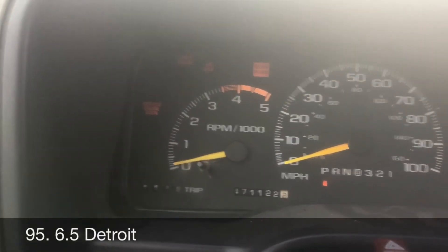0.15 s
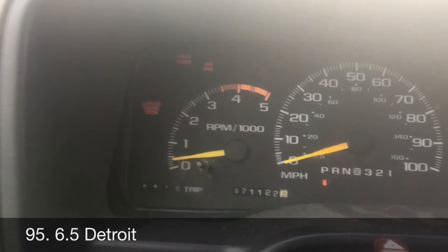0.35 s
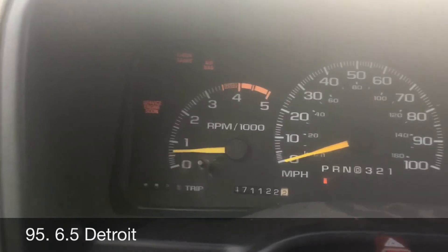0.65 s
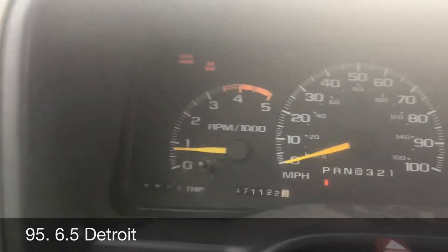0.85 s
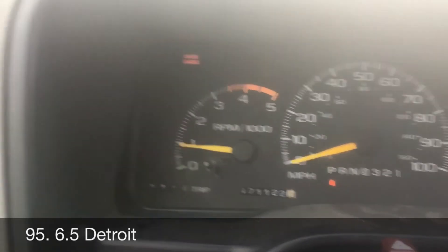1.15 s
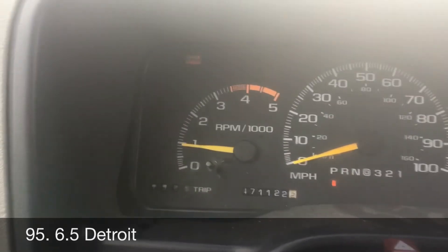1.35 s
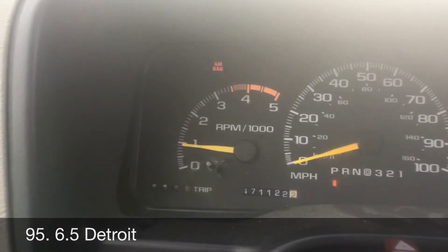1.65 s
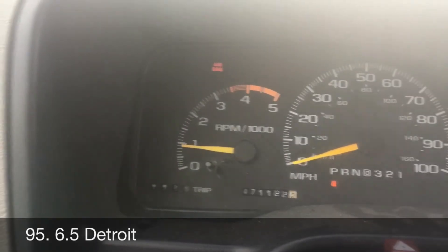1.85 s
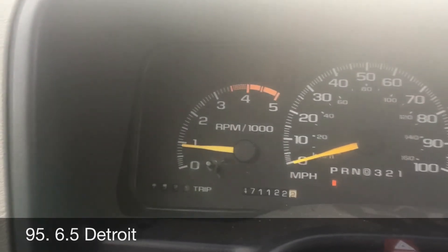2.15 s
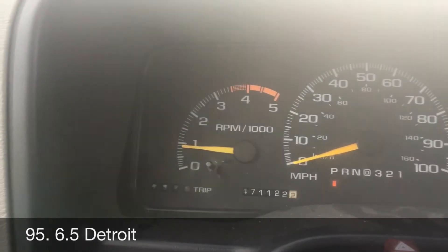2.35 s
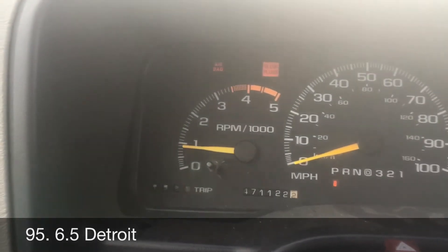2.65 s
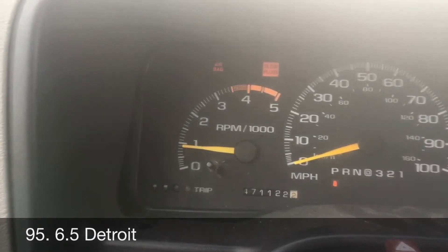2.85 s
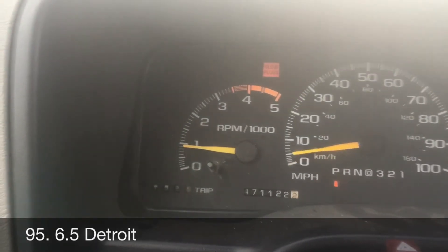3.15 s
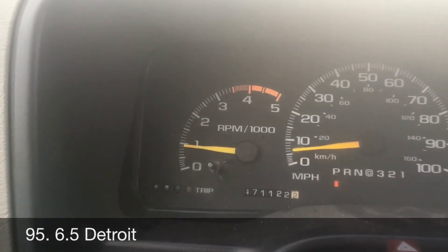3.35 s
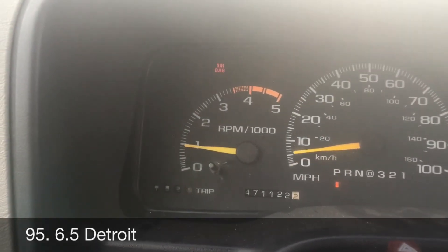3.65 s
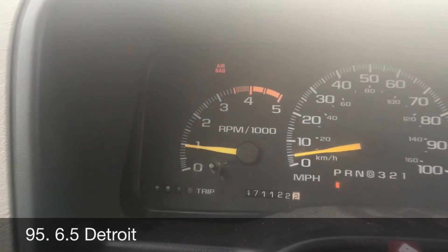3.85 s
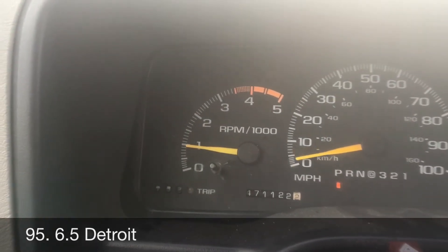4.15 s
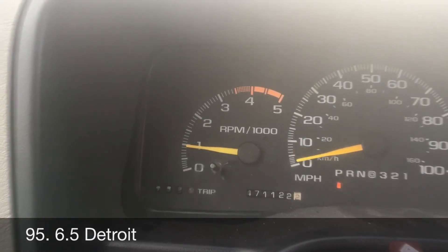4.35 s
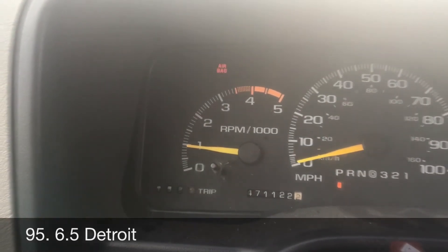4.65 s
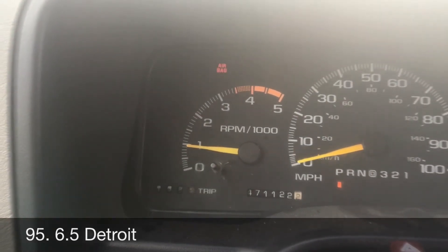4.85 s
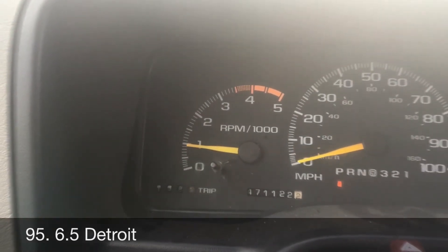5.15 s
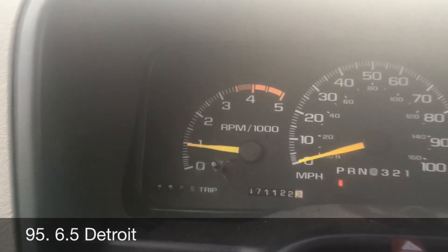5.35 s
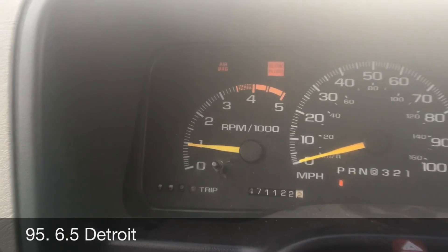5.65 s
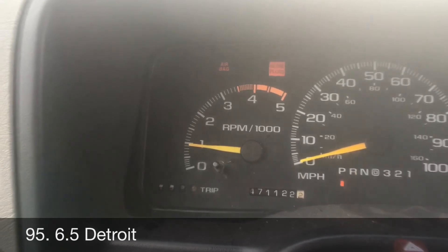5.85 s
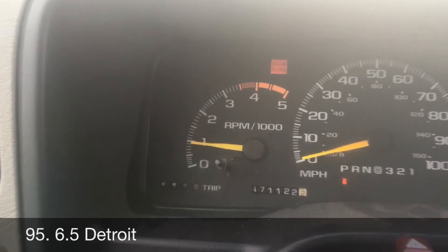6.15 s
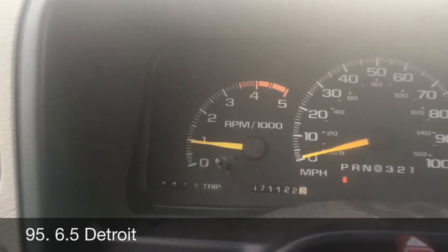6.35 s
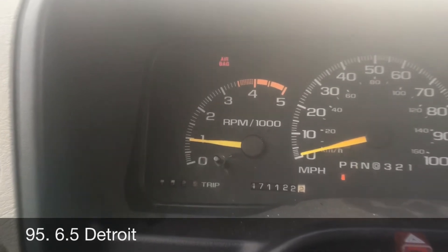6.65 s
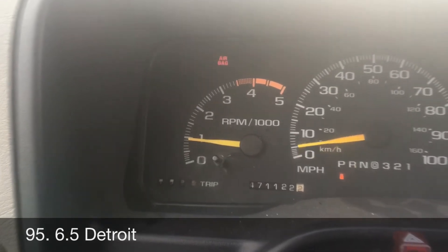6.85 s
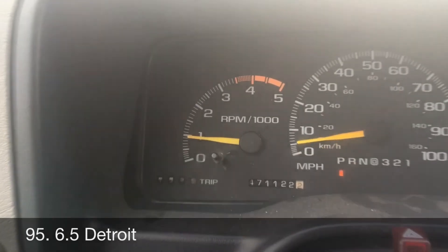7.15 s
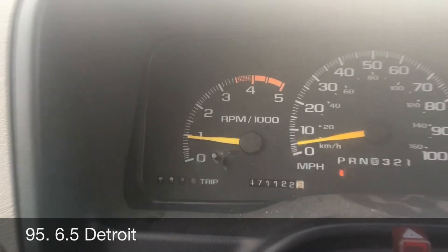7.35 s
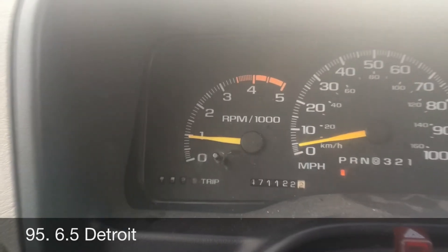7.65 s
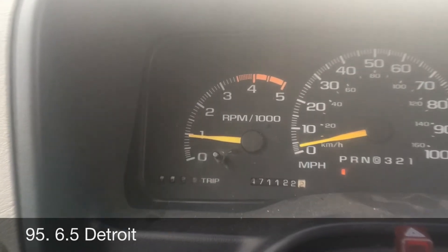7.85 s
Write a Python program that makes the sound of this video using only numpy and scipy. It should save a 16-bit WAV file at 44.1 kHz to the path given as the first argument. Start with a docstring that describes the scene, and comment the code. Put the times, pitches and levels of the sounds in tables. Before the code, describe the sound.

From the driver's seat of a shut diesel pickup, the tail of a starter growls, clunks and whirrs for under a second. The engine catches and flares with a deep boom, small clicks and squeaky belt chirps. It stumbles unevenly for a couple of seconds, revs up slightly, then holds a fast idle of low throbbing exhaust, muffled combustion knock and rapid injector ticking. The microphone is close inside the boomy cab, with little deep bass and faint hiss.

```python
"""A starter whirrs, clunks and growls, heard from the driver's seat of a cold V8 diesel pickup, doors shut.
The engine catches, flares with a few belt chirps, hunts and settles to a fast idle.
Exhaust orders swell in the booming cab; each firing also sets off noise bursts for the combustion knock,
its ring in the block and the injector ticking, through the bulkhead. Belt tones and a faint hiss lie on top."""
import sys
import numpy as np
from scipy import signal
from scipy.fft import rfft, irfft
from scipy.io import wavfile
from scipy.ndimage import uniform_filter1d

SR = 44100
rng = np.random.default_rng(int(sys.argv[2]) if len(sys.argv) > 2 else 0)


def to_wav(sig):
    """Store sig (one row per channel, or 1-D mono) as 16-bit WAV at the path in sys.argv[1].

    Samples outside -1..1 are clipped; the rate is SR.
    """
    pcm = np.clip(np.atleast_2d(sig), -1, 1) * 32767
    pcm = np.round(pcm).astype(np.int16)
    wavfile.write(sys.argv[1], SR, pcm.T)  # frames by channels


N = 353682
TIME = np.arange(N) / SR  # s

# The crankshaft catches, flares, sags and is twice nudged up by the governor.
# Each row: time in seconds, engine speed in rpm.
SPEED_CURVE = [(0.0, 513.1), (0.33, 555.5), (0.9, 955.4), (1.19, 992.0), (1.53, 849.4), (2.57, 820.0),
               (3.29, 904.7), (3.56, 993.8), (3.79, 958.3), (4.83, 866.6), (5.0, 922.6), (5.4, 863.1),
               (7.21, 880.7), (8.02, 863.8)]
IDLE_RPM = 870

# The eight cylinders in firing order, before their differences are scaled over time.
# Each row: knock in dB, injector tick in dB, hard ringing knock in dB.
CYLINDER_PATTERN = [(-2.5, 0.5, -2.5), (-1.5, -4.5, -10), (-4.5, -3, -13), (0.5, 2.5, -9.5), (-1, 4, 1.5),
                    (0.5, 4, 0.5), (1.5, -1, 3.5), (-1, 1, 0)]

# Bright colour of the injectors, and of the starter's rasp. Each row: frequency in Hz, relative level in dB.
TICK_SPECTRUM = [(900, -30.5), (1500, -2.5), (2100, 1), (2700, -5), (3300, -13.5), (4000, -23.5),
                 (5000, -24), (7000, -28.5), (10000, -35), (15000, -47)]


def from_db(db):
    """Decibels to amplitude gain."""
    return 10 ** (np.asarray(db) / 20)


def rms_one(x):
    """Scale to an rms of one."""
    return x / np.sqrt(np.mean(x ** 2) + 1e-20)


def in_time(rows):
    """Each column of a curve, interpolated at every sample."""
    seconds, *columns = np.transpose(rows)
    return [np.interp(TIME, seconds, column) for column in columns]


def evened(x, seconds):
    """Hold the running rms at one, keeping all that is faster."""
    size = int(seconds * SR / 2)
    power = np.abs(uniform_filter1d(uniform_filter1d(x ** 2, size), size))
    return x / np.sqrt(power + 1e-4 * np.mean(x ** 2))


def butter(x, hz, kind, order=2):
    """Butterworth filter."""
    sections = signal.butter(order, hz, kind, fs=SR, output="sos")
    return signal.sosfilt(sections, x + 1e-18)


def resonate(x, hz, width_hz):
    """One two-pole resonance with a gain of one on its top."""
    r = np.exp(-np.pi * width_hz / SR)
    zeros = np.array([1, 0, -1]) * (1 - r * r) / 2
    poles = [1, -2 * r * np.cos(2 * np.pi * hz / SR), r * r]
    return signal.lfilter(zeros, poles, x + 1e-18)


def coloured(x, spectrum, size=8192):
    """Causal (minimum-phase) filter that follows a spectrum."""
    hz, db = np.transpose(spectrum)
    grid = np.maximum(np.arange(size // 2 + 1) * SR / size, 1)
    below = np.minimum(grid / hz[0], 1) ** 2  # fall away under the lowest point
    gain = below * from_db(np.interp(np.log(grid), np.log(hz), db))
    cepstrum = irfft(np.log(gain + 1e-5))
    # folding the cepstrum onto positive time gives minimum phase
    response = irfft(np.exp(rfft(2 * cepstrum[:size // 2], size) - cepstrum[0]))
    return signal.fftconvolve(x, response)[:N]


def impulses(times, gains):
    """A click of the given height at each time."""
    out = np.zeros(N)
    at = np.round(times * SR).astype(int)
    inside = (at >= 0) & (at < N)
    np.add.at(out, at[inside], gains[inside])
    return out


def dying(x, t60):
    """Each click becomes an exponential decay that falls 60 dB in t60 seconds."""
    return signal.lfilter([1], [1, -from_db(-60 / (t60 * SR))], x + 1e-18)


def hits(table, spectrum, t60):
    """Short bursts of coloured noise, each struck at once and dying away."""
    times, db = np.transpose(table)
    noise = rms_one(coloured(rng.standard_normal(N), spectrum))
    return dying(impulses(times, from_db(db)), t60) * noise


def swell(full_s, until_s, db, rise_db_per_s, fall_db_per_s):
    """Gain that rises, holds and dies away."""
    before = np.maximum(full_s - TIME, 0)
    after = np.maximum(TIME - until_s, 0)
    return from_db(db - rise_db_per_s * before - fall_db_per_s * after)


def ramp(start_s, length_s):
    """Go from zero to one."""
    return np.clip((TIME - start_s) / length_s, 0, 1)


def bump(at_s, half_s):
    """A smooth Gaussian hump of height one."""
    return np.exp(-((TIME - at_s) / half_s) ** 2 / 2)


def wavering(hz, width_hz):
    """Noise twice through a resonance: an unsteady tone of rms one."""
    once = resonate(rng.standard_normal(N), hz, width_hz)
    return rms_one(resonate(once, hz, width_hz))


def cycles():
    """Four-stroke cycles completed: two turns of the crank each."""
    rpm = in_time(SPEED_CURVE)[0]
    return np.cumsum(rpm) / 120 / SR


def firings(delay):
    """Times and cylinder numbers of the firings; delay in firing intervals."""
    fired = cycles() * len(CYLINDER_PATTERN)
    number = np.arange(int(fired[-1]))
    return np.interp(number + delay, fired, TIME), number % len(CYLINDER_PATTERN)


def starter():
    """The starter whirrs and runs down, its gear clunks against the ring, and the pinion rasps out of mesh."""
    # Colour of the whirr. Each row: frequency in Hz, relative level in dB.
    whirr_spectrum = [(300, 11.5), (500, 4), (660, 10.5), (850, -2.5), (1150, 5), (1700, -19.5),
                      (2400, 1.5), (3000, -5.5), (3700, -7.5), (4200, -24.5), (5000, -19), (5600, -21),
                      (8000, -35.5)]
    # Pinion grinding out of mesh.
    # Each row: full at seconds, held until seconds, level in dB, rise in dB per s, fall in dB per s.
    rasp_swells = [(0.761, 0.783, -39.5, 450, 330), (0.93, .95, -43.5, 250, 120)]
    # Gear clunks. Each row: time in seconds, level in dB.
    clunk_hits = [(.071, -29.5), (.108, -37), (.137, -34), (.178, -37), (.206, -40)]
    # Colour of the clunks. Each row: frequency in Hz, relative level in dB.
    clunk_spectrum = [(150, -6), (400, 0), (680, 11), (1000, -3), (1600, -6), (3000, -14.5), (4500, -29),
                      (10000, -42)]

    spin = swell(full_s=0, until_s=.9, db=-46, rise_db_per_s=0, fall_db_per_s=100)
    whirr = spin * rms_one(coloured(rng.standard_normal(N), whirr_spectrum))
    grinding = sum(swell(*row) for row in rasp_swells)
    rasp = grinding * rms_one(coloured(rng.standard_normal(N), TICK_SPECTRUM))
    return whirr + rasp + hits(clunk_hits, clunk_spectrum, t60=0.1)


def boom_db():
    """Level of the exhaust: it lopes once a cycle while cold, surges on hard burns and drops out at misfires."""
    # Exhaust boom before lope, surges and misfires. Each row: time in seconds, level in dB.
    boom_level = [(0, -28.5), (.09, -19), (.75, -15.5), (1.05, -12), (1.5, -15.5), (2.7, -13.5),
                  (4.6, -15.5), (6.6, -14.5), (7.4, -16.5), (8, -15.5)]
    # A hard burn makes the boom surge. Each row: time in seconds, lift in dB.
    surge_lifts = [(.91, 3.5), (1.125, 5.5), (1.275, 5)]
    # A cylinder misfires and the boom drops out. Each row: time in seconds, dip in dB.
    misfire_dips = [(.785, 7), (1.179, 4), (1.375, 10), (1.52, 9), (1.925, 7.5), (2.301, 11.5),
                    (2.595, 10.5), (2.95, 8)]

    peak_place = 0.47  # where in the cycle the lope peaks, 0-1
    lope_swing_db = 1.5 * bump(at_s=1.9, half_s=1.0)
    lope = lope_swing_db * np.cos(2 * np.pi * (cycles() - peak_place))
    surges = sum(lift * bump(s, half_s=0.015) for s, lift in surge_lifts)
    misfires = sum(dip * bump(s, half_s=.018) for s, dip in misfire_dips)
    return in_time(boom_level)[0] + lope + surges - misfires


def exhaust(pipe_delay, dispersion):
    """Engine orders slide through the cab's boom and beat three times a cycle; uneven burns add rumble."""
    # The boom of the closed cab. Each row: frequency in Hz, relative level in dB.
    cab_spectrum = [(25, -42.5), (36, -4), (48, -6), (60, 2), (80, 0.5), (96, -9), (120, -15.5), (145, -12),
                    (175, -19.5), (205, -23), (300, -28.5), (500, -74.5)]
    # Exhaust tones; 8 is the firing rate, 11 and 13 come from the uneven beat of each bank.
    # Each row: multiple of the cycle rate, level in dB before the cab.
    exhaust_orders = [(6, -16.5), (7, -12), (8, 2.5), (9, -7.5), (10, -17), (11, 3.5), (13, -7.5),
                      (14, -3.5), (15, -2.5), (16, 1), (17, -9.5), (19, 2), (20, -12), (23, 0.5), (24, -6)]

    turned = cycles()
    cycle_hz = np.gradient(turned) * SR
    cab_hz, cab_db = np.transpose(cab_spectrum)
    steady = np.zeros(N)
    for order, db in exhaust_orders:
        order = round(order)
        gain = from_db(db + np.interp(np.log(order * cycle_hz), np.log(cab_hz), cab_db))
        # the silencer delays each order differently, which smears the pulses
        lag = order * pipe_delay + dispersion * (order - len(CYLINDER_PATTERN)) ** 2
        steady += gain * np.cos(2 * np.pi * (order * turned - lag))

    times, _ = firings(delay=0.525)
    burns = coloured(impulses(times, rng.standard_normal(len(times))), cab_spectrum)
    rush = 0.018 * coloured(rng.standard_normal(N), cab_spectrum)
    uneven = butter(burns + rush, 423, "low", order=3)
    # the irregular part fades by 1 dB per s as the cylinders warm
    irregular = from_db(-2 - 1 * TIME) * evened(uneven, seconds=0.12)
    boom = evened(steady, seconds=0.11) + irregular
    return from_db(boom_db()) * evened(boom, seconds=0.15)


def blows(pattern_db, delay, rise_s, t60, repeat_share, rough_db):
    """Each firing sets off a dense ring building up through the bulkhead, part alike each time, part random."""
    # How strongly the cylinders differ. Each row: time in seconds, factor on their pattern.
    unevenness = [(.9, .2), (1.35, 1.5), (3.5, 1.93), (4.6, 1.13), (8, 0.99)]

    times, cylinder = firings(delay)
    depth = np.interp(times, *np.transpose(unevenness))
    strength, late = rng.standard_normal((len(times), 2)).T
    gains = from_db(depth * pattern_db[cylinder] + rough_db * strength)

    age = TIME[:SR // 6]
    fade = (1 - np.exp(-age / rise_s)) * from_db(-60 * age / t60)
    rings = rng.standard_normal((len(CYLINDER_PATTERN), len(fade))) * fade
    alike = np.zeros(N)
    for number, ring in enumerate(rings):
        own_blows = impulses(times, gains * (cylinder == number))
        alike += signal.oaconvolve(own_blows, ring)[:N]

    # valves and loose parts rattle a little early or late, in small clumps
    scattered = impulses(times + late * 0.0041, gains ** 2)
    power = np.abs(signal.oaconvolve(scattered, fade ** 2)[:N])
    clump_db = 1.0 * rms_one(butter(rng.standard_normal(N), 100, "low"))
    clumps = rms_one(from_db(clump_db))
    share = np.clip(repeat_share, 0, 1)
    rattle = np.sqrt((1 - share) * power) * clumps * rng.standard_normal(N)
    return np.sqrt(share) * alike + rattle


def block(x):
    """The iron block and the bulkhead lift their own resonances."""
    # Each row: resonance in Hz, width in Hz, lift in dB.
    resonances = [(336, 8.3, 6), (477, 6, 6), (531.5, 30, 5), (935, 33, 4.5), (1108, 19, 5),
                  (1162, 16, 9.5), (1522, 4.3, 6.5), (1772, 14, 10), (1970, 54, 6), (2275, 13, 8),
                  (2525, 86, 2.5), (4490, 93, 6)]
    return x + sum((from_db(db) - 1) * resonate(x, hz, width) for hz, width, db in resonances)


def injector_db():
    """Level of the ticking, from engine speed, warmth and the governor's extra fuel."""
    revs = 0.02 * (in_time(SPEED_CURVE)[0] - IDLE_RPM)  # dB, at 0.02 dB per rpm
    cold = -7.5 * np.exp(-TIME / 2.97)  # dB, quieter until the engine warms
    # extra fuel lifts the idle, and the ticking turns to clacking
    clack = 3.5 * bump(at_s=3.3, half_s=0.43)
    return -45 + revs + cold + clack


def clatter():
    """Combustion knock, its hard ring in the block, and the brighter ticking of injectors and valves."""
    # Combustion knock, hardest under the load of the flare, before the late hardening.
    # Each row: time in seconds, level in dB.
    knock_level = [(0, -38), (.27, -51.5), (.5, -37.5), (.85, -36.5), (1.0, -31.5), (1.6, -34), (2.05, -35),
                   (2.25, -39.5), (3.3, -35.5), (4.7, -36.5), (8, -35.5)]
    # Colour of the knock ahead of the block. Each row: frequency in Hz, relative level in dB.
    knock_spectrum = [(130, -11.5), (220, 6.5), (400, 0.5), (700, 2), (1000, -3.5), (1400, -2.5),
                      (1900, -12.5), (2500, -18.5), (3500, -44), (5000, -68.5)]
    # Colour of the hard ring ahead of the block. Each row: frequency in Hz, relative level in dB.
    ring_spectrum = [(500, -22.5), (750, -12.5), (920, 1.5), (1180, -2.5), (1350, -10), (1700, -14),
                     (2300, -21), (4000, -58)]

    # late on the knock hardens all at once
    knock_db = in_time(knock_level)[0] + 3.5 * ramp(start_s=7.42, length_s=0.084)
    # the ring follows the knock, grows as the engine warms and is harder as the flare dies back
    ring_growth_db = 0.99 * TIME
    ring_db = knock_db - 12 + ring_growth_db + 3 * bump(at_s=1.45, half_s=.3)

    knock_pattern, tick_pattern, ring_pattern = np.transpose(CYLINDER_PATTERN)
    knock = blows(knock_pattern, delay=-0.0988, rise_s=0.003, t60=0.14, repeat_share=0.37, rough_db=1.34)
    ring = blows(ring_pattern, delay=-0.1012, rise_s=0.0027, t60=0.09, repeat_share=0.1, rough_db=2.2)
    tick = blows(tick_pattern, delay=-.2, rise_s=0.0055, t60=0.15, repeat_share=0.29, rough_db=1.94)
    knock = from_db(knock_db) * evened(block(coloured(knock, knock_spectrum)), seconds=0.4)
    ring = from_db(ring_db) * evened(block(coloured(ring, ring_spectrum)), seconds=1.0)
    tick = from_db(injector_db()) * evened(block(coloured(tick, TICK_SPECTRUM)), seconds=0.93)
    return knock + ring + tick


def hiss():
    """Faint high noise that follows the revs and slowly fades, with three swells topped by a thin whistle."""
    # Colour of the hiss. Each row: frequency in Hz, relative level in dB.
    hiss_spectrum = [(3500, 0.5), (4900, -18), (5400, -4.5), (6500, 1), (7100, -4), (7600, -7.5),
                     (8800, -1), (10300, -12.5), (11100, -9.5), (11650, -5.5), (12200, -10.5),
                     (15500, -9.5)]
    # When it swells. Each row: full at seconds, held until seconds.
    hiss_swells = [(1.6, 2.72), (3.9, 5.8), (6.88, 6.9)]

    revs_db = 0.0124 * (in_time(SPEED_CURVE)[0] - IDLE_RPM)
    fade_db = 0.45 * TIME
    steady_db = -62.0 + revs_db - fade_db
    swells = sum(swell(full, until, db=-64, rise_db_per_s=88, fall_db_per_s=88) for full, until in hiss_swells)
    steady = rms_one(coloured(rng.standard_normal(N), hiss_spectrum))
    swelling = rms_one(coloured(rng.standard_normal(N), hiss_spectrum))
    whistle = from_db(-16) * wavering(11640, width_hz=600)
    return from_db(steady_db) * steady + swells * (swelling + whistle)


def shudder():
    """The starter and the rocking engine shake the cab; one dash panel drones and the intake honks."""
    # Dash panel: a burst, then a lingering drone.
    # Each row: full at seconds, held until seconds, level in dB, rise in dB per s, fall in dB per s.
    drone_swells = [(0.672, 0.725, -29, 86, 175), (1.0, 1.1, -41.5, 25, 2.07)]

    growl = swell(full_s=.08, until_s=.22, db=-21, rise_db_per_s=25, fall_db_per_s=95)
    # the engine rocks on its mounts during the flare
    rocking = swell(full_s=1.05, until_s=1.1, db=-29.5, rise_db_per_s=28, fall_db_per_s=20)
    rumble = evened(butter(rng.standard_normal(N), [115, 175], "band", order=3), seconds=0.056)
    panel = evened(wavering(272, width_hz=9), seconds=0.022)
    drone = sum(swell(*row) for row in drone_swells) * panel
    # intake under load; its rise and fall cross before either is complete
    load = swell(full_s=1.37, until_s=1.33, db=-38.5, rise_db_per_s=17, fall_db_per_s=22.5)
    honk = load * wavering(652, width_hz=140)
    return (growl + rocking) * rumble + drone + honk


def key_clicks():
    """Key switch and trim click close by: short bright noise bursts."""
    # Each row: time in seconds, level in dB.
    click_hits = [(.538, -57), (.638, -36), (.748, -42.5), (1.257, -47)]
    # Colour of the clicks. Each row: frequency in Hz, relative level in dB.
    click_spectrum = [(1000, -11), (4000, -13), (5500, -7.5), (6900, -2), (7800, -10.5), (9500, -13),
                      (13000, -19), (16000, -7)]
    return hits(click_hits, click_spectrum, t60=0.057)


def belt_chirps(fall_per_s, rasp):
    """The cold belt slips: short rough chirps that sag in pitch."""
    # Each row: time in seconds, pitch in Hz, level in dB, half length in seconds.
    chirps = [(0.788, 1870, -31, 0.019), (0.871, 1540, -35, 0.0071), (0.931, 1470, -27.5, 0.0061),
              (1.028, 1410, -33, 0.0076), (1.103, 1524, -29, .008), (1.182, 1520, -24.5, 0.0028),
              (1.241, 1140, -26.5, 0.0048), (1.376, 1174, -32, 0.02), (2.001, 1480, -28.5, 0.008)]

    out = np.zeros(N)
    waver = rasp * rms_one(butter(rng.standard_normal(N), 204, "low"))
    for s, hz, db, half in chirps:
        pitch = hz * (1 - fall_per_s * (TIME - s) + waver)
        out += from_db(db) * bump(s, half) * np.sin(2 * np.pi * np.cumsum(pitch) / SR)
    return out


def belt_song():
    """Light, steady slip keeps the belt singing in two wavering tones."""
    # Each row: tone in Hz, width in Hz, relative level in dB.
    belt_tones = [(1537, 130, 0.5), (1730, 70, -2.5)]
    # Loud at first, then lingering.
    # Each row: full at seconds, held until seconds, level in dB, rise in dB per s, fall in dB per s.
    song_swells = [(1.497, 2.0, -47.5, 45, 59), (1.6, 1.697, -50, 40, 1.6)]

    tones = sum(from_db(db) * wavering(hz, width) for hz, width, db in belt_tones)
    return sum(swell(*row) for row in song_swells) * rms_one(tones)


def scene():
    """Everything at the driver's seat, in one channel."""
    # pipe delay in cycles of each order's own tone, per order
    engine = exhaust(pipe_delay=.436, dispersion=0.02507) + clatter() + shudder()
    # pitch falls by 1.2 of itself per second; rasp is the rms share of the pitch
    belt = belt_chirps(fall_per_s=1.2, rasp=0.0356) + belt_song()
    return (starter() + engine + hiss() + key_clicks() + belt)[None]


def record(dry):
    """The microphone drops the deepest bass; the top is cut steeply at 15.6 kHz."""
    thinned = butter(dry, 30, "high", order=4)
    top_cut = signal.ellip(14, .1, 90, 15600, fs=SR, output="sos")
    return signal.sosfilt(top_cut, thinned)


dry = scene()
out = record(dry)
to_wav(out)
```